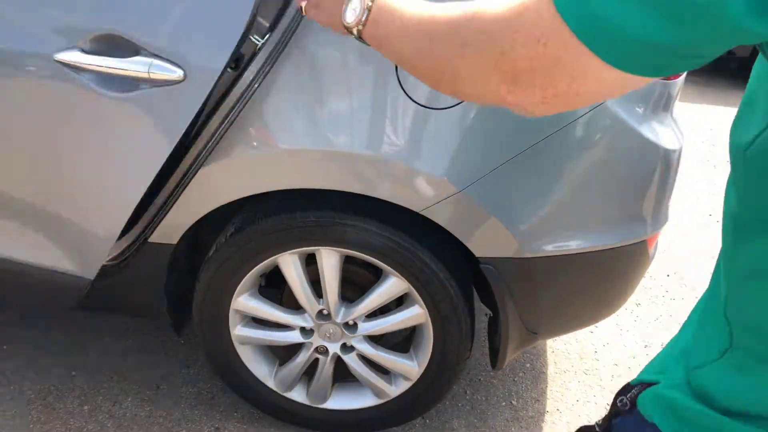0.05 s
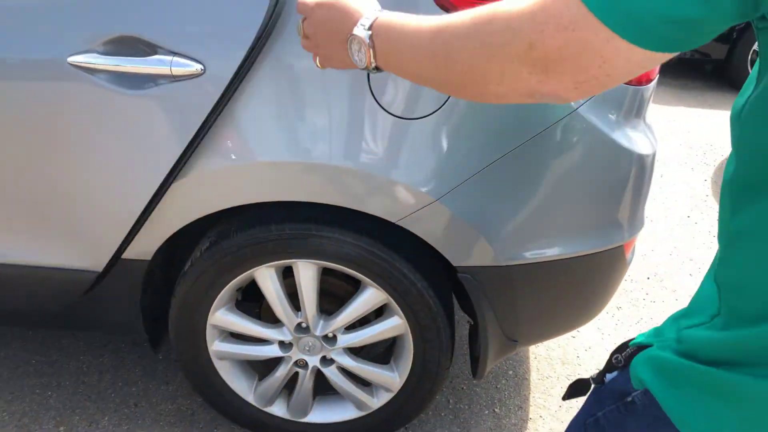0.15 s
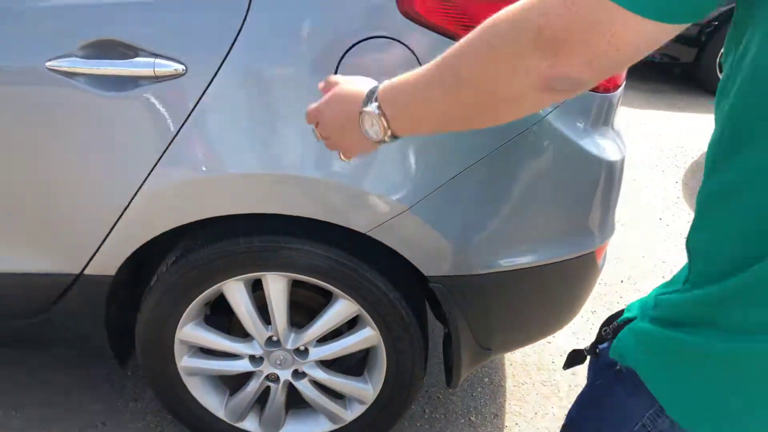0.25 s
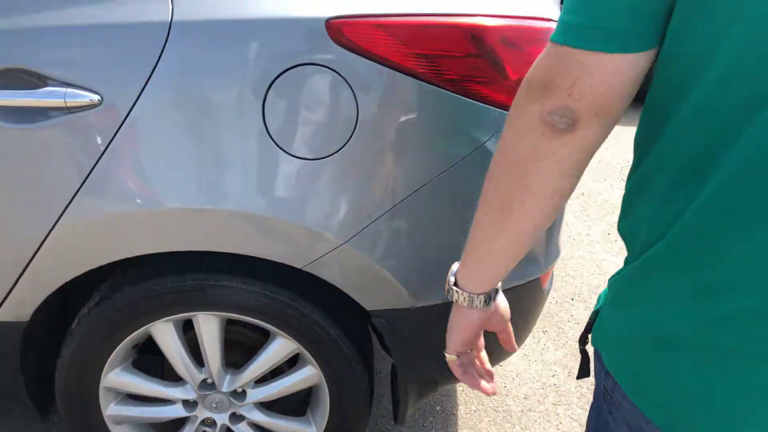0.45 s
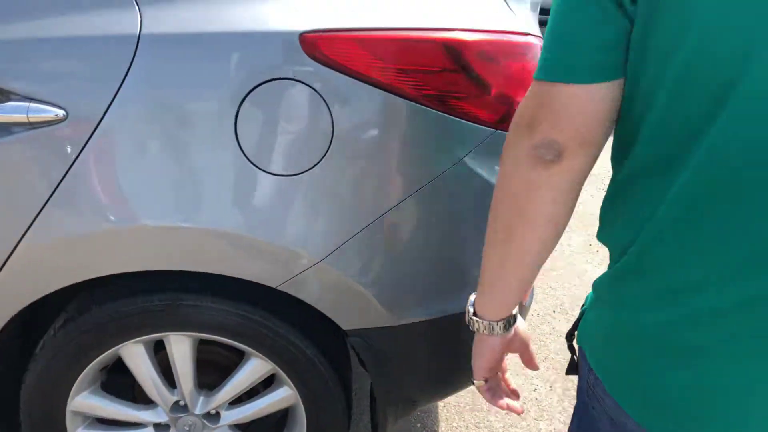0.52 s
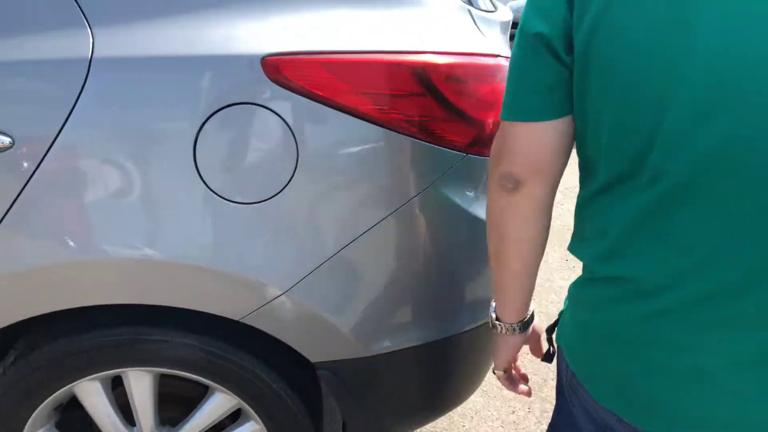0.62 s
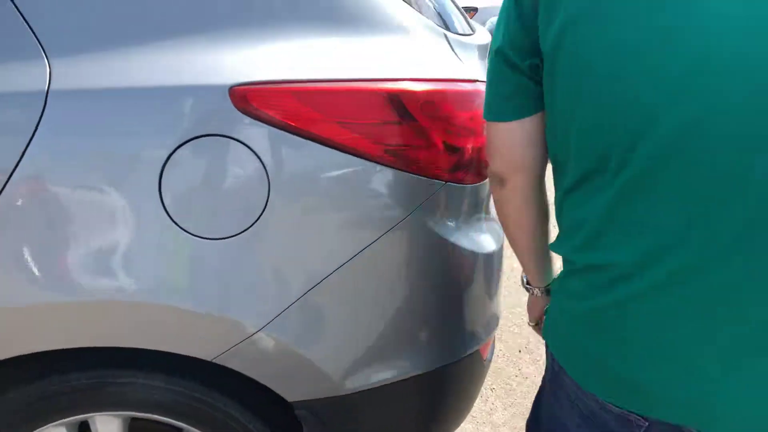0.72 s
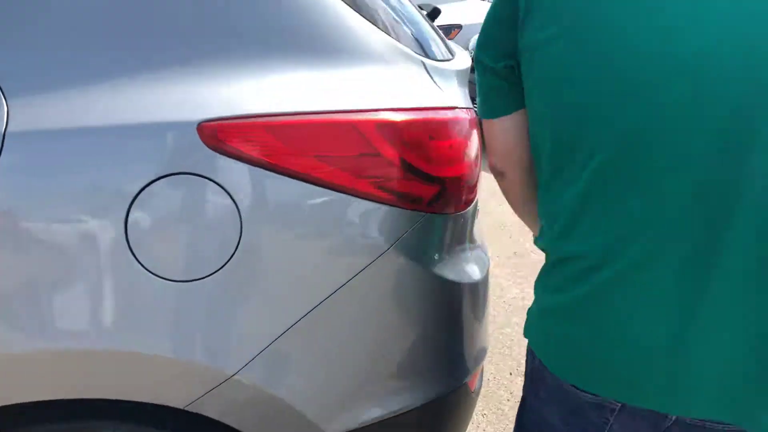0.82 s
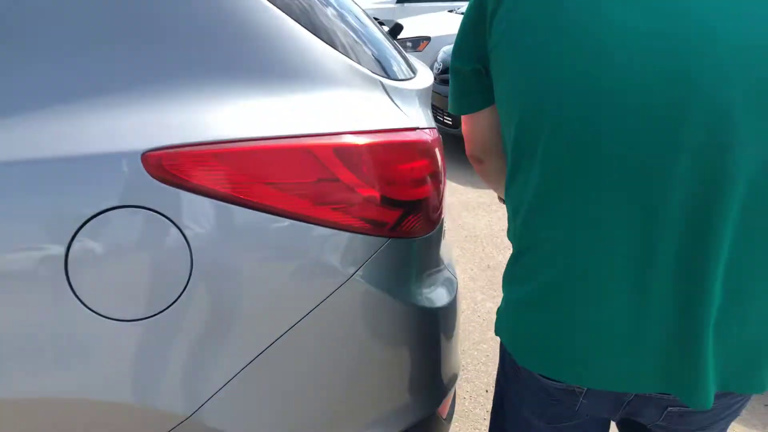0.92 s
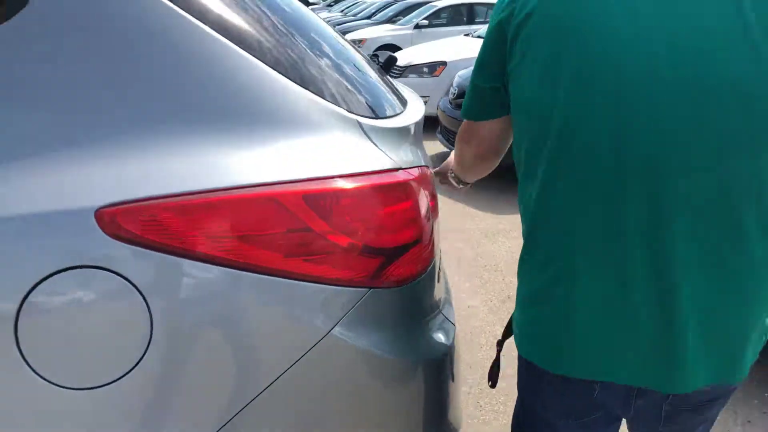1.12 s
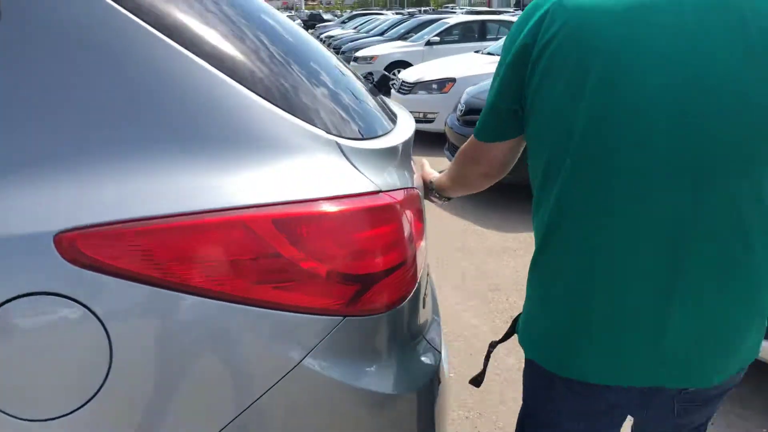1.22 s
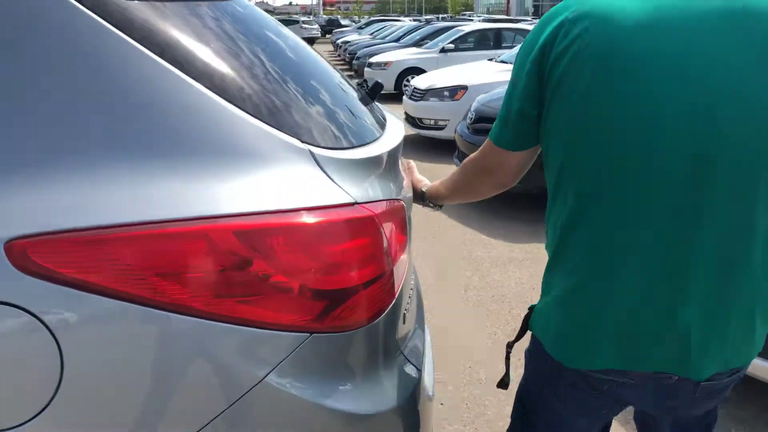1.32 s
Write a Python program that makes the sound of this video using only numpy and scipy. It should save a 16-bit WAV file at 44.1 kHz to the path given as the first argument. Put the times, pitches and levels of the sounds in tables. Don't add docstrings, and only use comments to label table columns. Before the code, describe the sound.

Car door slam, heavy and short, with metallic latch click, over faint distant road rumble

```python
import sys
import numpy as np
from scipy import signal
from scipy.fft import rfft, irfft
from scipy.io import wavfile

SR = 44100
rng = np.random.default_rng(int(sys.argv[2]) if len(sys.argv) > 2 else 0)


def gain_from_decibels(decibels):
    exponent = np.asarray(decibels, float) / 20
    return 10 ** exponent


def generate_wav(sig):
    pcm = np.round(np.clip(np.atleast_2d(sig).T, -1, 1) * 32767).astype(np.int16)
    wavfile.write(sys.argv[1], SR, pcm)


N = 59535
TIME = np.arange(N) / SR


def rms_one(x):
    return x / np.sqrt(np.mean(x ** 2) + 1e-20)


def in_time(rows):
    return np.interp(TIME, *np.transpose(rows))


def drift(rate):
    stride = 40
    r = np.exp(-2 * np.pi * stride * rate / SR)
    white = rng.standard_normal(N // stride + 2002)
    slow = rms_one(signal.lfilter([1], [1, -2 * r, r * r], white)[2000:])
    return np.interp(np.arange(N) / stride, np.arange(len(slow)), slow)


def coloured(spectrum, patchy_db):
    hz, db = np.transpose(spectrum)
    f = np.maximum(np.fft.rfftfreq(N, 1 / SR), 1)
    gain = gain_from_decibels(np.interp(np.log(f), np.log(hz), db, -90, -90))
    whole = rfft(rng.standard_normal(N)) * gain
    place = 3 * np.log2(f / 20)
    together = drift(2.0)
    first, last = int(3 * np.log2(hz[0] / 20)), int(3 * np.log2(hz[-1] / 20)) + 1
    out = np.zeros(N)
    for k in range(first, last + 1):
        band = irfft(whole * np.clip(1 - abs(place - k), 0, 1), N)
        out += band * gain_from_decibels(patchy_db * (.5 * together + drift(11.0)))
    return rms_one(out)


def resonance(x, hz, width_hz):
    r = np.exp(-np.pi * width_hz / SR)
    poles = [1, -2 * r * np.cos(2 * np.pi * hz / SR), r * r]
    return signal.lfilter([(1 - r * r) / 2, 0, (r * r - 1) / 2], poles, x)


def noise_band(white, hz, width_hz, second_width_hz):
    return rms_one(resonance(resonance(white, hz, width_hz), hz, second_width_hz))


def strike(modes, hits, rise_s):
    out = np.zeros(N)
    for s, push in hits:
        t = np.maximum(TIME - s, 0)
        rise = 1 - np.exp(-t / rise_s)
        for hz, db, t60 in modes:
            out += push * gain_from_decibels(db - 60 * t / t60) * np.sin(2 * np.pi * hz * t) * rise
    return out


def rings(rows):
    return sum(strike([(hz, db, t60)], [(s, 1)], 1.35 / hz) for s, hz, db, t60 in rows)


def window(s, length):
    t = TIME - s
    release_s = 0.0016 + 0.18 * length
    return np.clip(t / 0.0007, 0, 1) * np.exp(-np.maximum(t - length, 0) / release_s)


def cabin_boom():
    # f/Hz, level/dB, t60/s
    cabin_modes = [(63.2, -5, .077), (98.2, 9.6, .0365), (151.5, -16.7, .08), (200.8, -12.6, .06)]
    # t/s, push (+ in, - out)
    seats = [
        (.2529, -.552),
        (.2606, .715),
        (.2664, -1.19),
        (.2752, .785),
        (.3008, -.554),
        (.3145, -.15),
    ]
    return strike(cabin_modes, seats, rise_s=.0255)


def skin_knock():
    # f/Hz, level/dB, t60/s
    skin_modes = [(284, -14.1, .072), (441.6, .2, .0142), (669, -7.5, .014), (766, -13.7, .0234),
                  (993, -16.7, .02)]
    # t/s, signed strength
    knocks = [
        (.2459, -.41),
        (.2467, 1.17),
        (.2549, .21),
        (.2995, .08),
    ]
    return strike(skin_modes, knocks, rise_s=.0022)


def air_crack():
    # f/Hz, level/dB per Hz
    crack_spectrum = [(1500, -22), (2300, -7), (3200, -11), (4600, -8), (5800, -11), (7500, -12.5),
                      (11000, -12.5), (15000, -14)]
    start_s, rise_s, hold_s, t60_s = .243, .004, .0105, .035
    t = TIME - start_s
    swell = np.exp(np.minimum(t, 0) / rise_s)
    decay = gain_from_decibels(-60 * np.maximum(t - hold_s, 0) / t60_s)
    grain_db = 2.5 * drift(150)
    return gain_from_decibels(-43 + grain_db) * np.where(t < 0, swell, decay) * coloured(crack_spectrum, 0)


def latch():
    # f/Hz, level/dB, t60/s
    latch_modes = [(830, -10, .02), (1050, -11, .03), (1210, -11, .025), (1425, -4, .02), (1720, -6, .02),
                   (1970, -6, .02), (2090, -10, .02), (2295, -8, .028), (2770, -9, .018), (3175, -10, .02),
                   (3490, -11, .02), (4030, -15, .015), (5300, -20, .012), (7500, -17, .01)]
    # start t/s, length/s, level/dB
    rattles = [
        (0.222, 0.015, -62),
        (0.246, 0.011, -46),
        (0.261, 0.016, -54.5),
        (0.273, 0.02, -53),
        (0.289, .02, -59),
    ]
    # t/s, level/dB
    contacts = [(.2262, -38), (0.2295, -38), (.234, -42), (0.2397, -36.5), (0.2422, -29.5), (0.2458, -30),
                (0.2496, -27), (0.2534, -30), (0.2566, -31.5), (0.2616, -34.5), (0.2671, -45),
                (0.2736, -38), (.281, -39), (0.2903, -45)]
    rattles_per_s, rattle_spread_db, contact_spread_db = 3100, -9, 0.5
    run = sum(gain_from_decibels(db) * (TIME > s) * (TIME < s + length) for s, length, db in rattles)
    born = rng.random(N) < rattles_per_s / SR
    size = gain_from_decibels(rattle_spread_db * np.minimum(rng.exponential(1, N), 3))
    contact_s, contact_db = np.transpose(contacts)
    contact_at = (contact_s * SR).astype(int)
    out = np.zeros(N)
    for hz, db, t60 in latch_modes:
        clicks = run * born * size
        clicks[contact_at] += gain_from_decibels(contact_db + contact_spread_db * rng.standard_normal(len(contact_s)))
        clicks = clicks * rng.choice([-1, 1], N) + 1e-18
        r, w = gain_from_decibels(-60 / (t60 * SR)), 2 * np.pi * hz / SR
        out += gain_from_decibels(db) * signal.lfilter([0, np.sin(w)], [1, -2 * r * np.cos(w), r * r], clicks)
    return out


def seal_brush():
    band = noise_band(rng.standard_normal(N), 398, 580, 550)
    return gain_from_decibels(-37.5) * window(.227, 0.014) * band


def shudder():
    # f/Hz, width/Hz, level/dB, t60/s
    panels = [(85, 35, -39, 0.96), (150, 47, -39, 0.93), (210, 79, -32.5, 0.36), (453, 140, -35, 0.206),
              (820, 250, -31, .13), (1300, 1700, -43, 0.12), (2530, 1700, -43, 0.083),
              (5000, 3000, -51, 0.2), (11000, 1900, -53, 0.12)]
    t = np.maximum(TIME - .252, 0)
    white = rng.standard_normal((2, N))
    out = np.zeros(N)
    for k, (hz, width, db, t60) in enumerate(panels):
        rise = 1 - np.exp(-(t * hz / 1.9) ** 2)
        out += gain_from_decibels(db - 60 * t / t60) * rise * noise_band(white[k % 2], hz, width, width)
    return out


def door():
    return cabin_boom() + skin_knock() + air_crack() + latch() + seal_brush() + shudder()


def striker():
    # t/s, f/Hz, level/dB, t60/s
    bite = [(.2452, 1450, -24, 0.032), (.2465, 1140, -32, 0.034), (.246, 1970, -32.5, .045),
            (.2415, 2300, -26, 0.083), (0.22, 2770, -37.5, .04), (.246, 3176, -38, 0.061),
            (.2465, 3487, -36.5, .04), (.2455, 3735, -36, .04), (.247, 4030, -41.5, 0.031),
            (.245, 4640, -43, 0.026), (.248, 5380, -40.5, 0.027), (.2415, 7600, -47, 0.028),
            (.2415, 7100, -39, 0.032)]
    return rings(bite)


def settling():
    # t/s, f/Hz, level/dB, t60/s
    settling_rings = [
        (.271, 6930, -45.5, 0.024),
        (0.25, 207.5, -36, 0.08),
        (0.3, 450, -38, .06),
        (.292, 470, -31, 0.096),
        (.311, 409, -33.5, 0.08),
        (.2268, 430, -24, 0.02),
        (0.22, 420, -26, 0.018),
    ]
    return rings(settling_rings)


def echoes(x):
    # delay t/s, level/dB
    returns = [
        (.013, -33),
        (0.024, -17.5),
        (0.042, -24),
        (.067, -35),
    ]
    band = resonance(x, 890, 2300)
    return sum(gain_from_decibels(db) * np.interp(TIME - s, TIME, band, 0) for s, db in returns)


def trim_clicks():
    # t/s, f/Hz, level/dB, t60/s
    trim = [(.0542, 4100, -40, .005), (.0588, 3950, -36, .016), (.0615, 3000, -42, .01),
            (.2925, 3970, -46, .04), (.6888, 4600, -33, .004), (.6972, 4750, -30, .004),
            (.7008, 4600, -33, .004), (.7088, 4500, -30, .004), (.7088, 6800, -38, .003),
            (.7112, 4800, -36, .004), (.7145, 4800, -38, .005)]
    return rings(trim)


def ticks():
    # t/s, length/s, f/Hz, width/Hz, level/dB
    touches = [(0.0566, 0.0052, 6350, 3040, -51.5), (0.05, 0.015, 13150, 4000, -63),
               (0.454, .02, 13000, 3000, -64), (.558, 0.0044, 13000, 4000, -60),
               (0.699, 0.026, 8650, 10000, -61.5), (0.708, .018, 5500, 3500, -57.5),
               (0.718, 0.0092, 3300, 1500, -51), (.744, 0.0043, 12000, 6000, -65),
               (1.081, 0.006, 8000, 8000, -62), (1.084, 0.0093, 2450, 400, -55),
               (.742, 0.014, 714, 150, -46), (1.082, 0.013, 4620, 600, -56.5),
               (1.227, 0.0037, 12000, 6000, -65), (1.282, .008, 11000, 5000, -68.5)]
    white = rng.standard_normal(N)
    return sum(gain_from_decibels(db) * window(s, length) * noise_band(white, hz, width, width)
               for s, length, hz, width, db in touches)


def snaps():
    # t/s, level/dB
    scuff = [
        (0.69, -54),
        (.7026, -53),
        (.709, -48),
        (.7112, -49),
        (.7172, -50),
        (.7232, -52),
        (.7275, -52),
        (.745, -46),
        (.7478, -54),
    ]
    high_pass = signal.butter(2, 3500, "high", fs=SR, output="sos")
    bright = rms_one(signal.sosfilt(high_pass, rng.standard_normal(N)))
    t60_s = .003
    return bright * sum(gain_from_decibels(db - 60 * np.maximum(TIME - s, 0) / t60_s) * (TIME >= s) for s, db in scuff)


def wavering_tone(hz):
    return np.sqrt(2) * np.sin(2 * np.pi * np.cumsum(hz) / SR)


def idling_engine():
    # t/s, level/dB
    throb = [(0, -41.5), (.05, -54), (.09, -52), (.17, -83), (.4, -34.5), (.47, -52), (.515, -67),
             (.57, -39), (.62, -42), (.68, -73), (.79, -42.5), (.85, -49), (.97, -40.5), (1.03, -46),
             (1.1, -70), (1.2, -50.5), (1.29, -41), (1.35, -43)]
    return gain_from_decibels(in_time(throb)) * wavering_tone(70.5 + 6.3 * drift(17.0))


def engine_drones():
    # f/Hz, width/Hz, level/dB
    engines = [
        (105.8, 4.15, -50.5),
        (130.6, 5.06, -50.5),
        (215, 6.77, -60),
    ]
    return sum(gain_from_decibels(db + 3.0 * drift(5.6)) * wavering_tone(hz + width * 0.316 * drift(4.9))
               for hz, width, db in engines)


def passing_cars():
    # f/Hz, level/dB per Hz
    tyre_spectrum = [(210, -36), (350, -3), (399, -4.5), (514, -7), (937, 0.5), (1540, -8), (1730, -9),
                     (2200, -18.5), (2860, -20), (4840, -120)]
    # t/s, level/dB
    tyre_swell = [(0, -48), (.2, -45), (.35, -47.5), (.6, -48), (.85, -47.5), (1.05, -46), (1.35, -46)]
    # f/Hz, level/dB per Hz
    swish_spectrum = [(1500, -0.5), (2100, 0), (3000, 1), (4200, -2), (5500, -5), (6200, -13), (7800, -14),
                      (8600, -27)]
    # t/s, level/dB
    swish_swell = [(0, -54), (.1, -53.5), (.22, -56.5), (.35, -57.5), (.6, -56), (.85, -55), (1.0, -52),
                   (1.15, -54), (1.35, -51.5)]
    roar = gain_from_decibels(in_time(tyre_swell)) * coloured(tyre_spectrum, patchy_db=0.64)
    swish = gain_from_decibels(in_time(swish_swell)) * coloured(swish_spectrum, patchy_db=1.5)
    return roar + swish


def rumble():
    # f/Hz, level/dB per Hz
    rumble_spectrum = [(15, -66), (25, -23.5), (70, -2.5), (139, -6.5), (158, -9.5), (216, -11.5),
                       (284, -16), (318, -15), (500, -54), (650, -66), (1100, -120)]
    return gain_from_decibels(-43.5) * coloured(rumble_spectrum, patchy_db=0.56)


def hiss():
    # f/Hz, level/dB per Hz
    hiss_spectrum = [(3530, -51), (6000, 0), (8500, -3.5), (9920, -3), (12900, -3), (15800, -6)]
    # t/s, level/dB
    hiss_swell = [(0, -63), (.3, -64), (.6, -63.5), (.8, -65), (1.1, -69), (1.35, -69)]
    return gain_from_decibels(in_time(hiss_swell)) * coloured(hiss_spectrum, patchy_db=1.65)


def scene():
    slam = door()
    car = slam + echoes(slam) + striker() + settling()
    handling = trim_clicks() + ticks() + snaps()
    traffic = idling_engine() + engine_drones() + passing_cars() + rumble()
    return (car + handling + traffic + hiss())[None]


def band_limit(x):
    return signal.sosfilt(signal.butter(12, 16120, fs=SR, output="sos"), x)


def record(dry):
    low_cut = signal.butter(1, 12, "high", fs=SR, output="sos")
    top_cut = signal.butter(4, 15400, fs=SR, output="sos")
    mix = signal.sosfilt(top_cut, signal.sosfilt(low_cut, dry))
    return band_limit(mix)


dry = scene()
out = record(dry)
generate_wav(out)
```